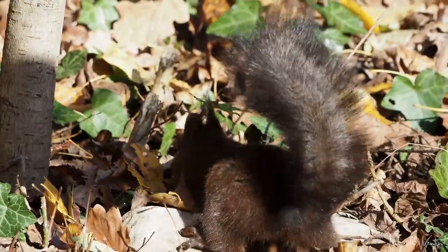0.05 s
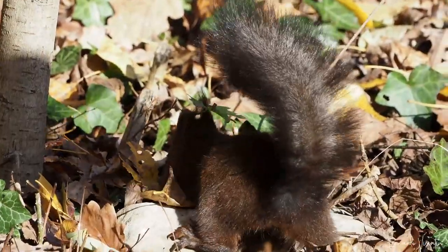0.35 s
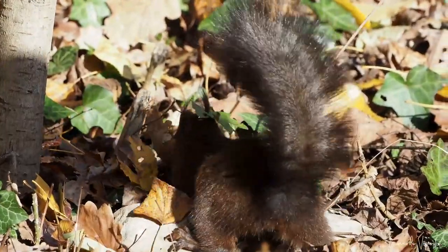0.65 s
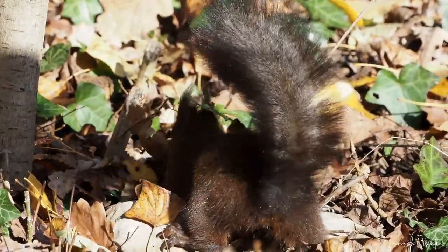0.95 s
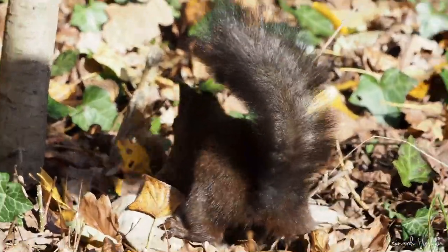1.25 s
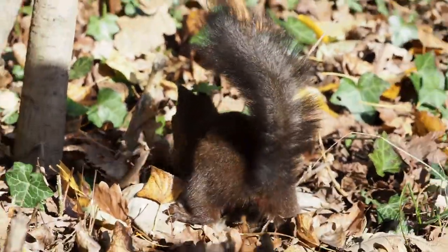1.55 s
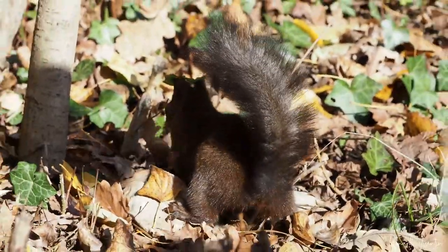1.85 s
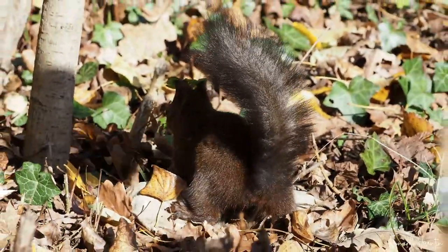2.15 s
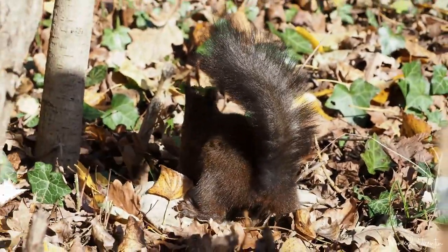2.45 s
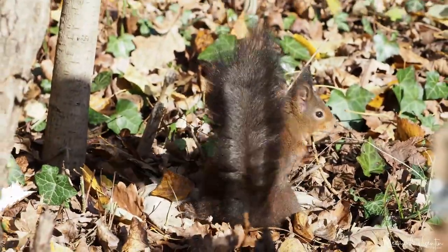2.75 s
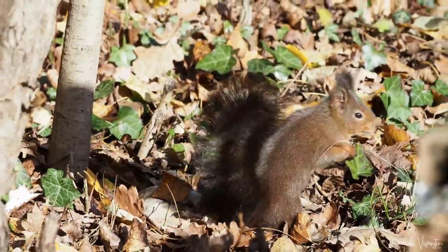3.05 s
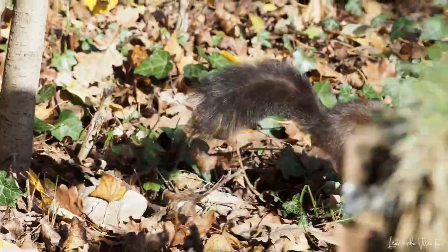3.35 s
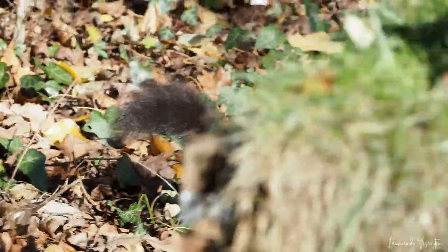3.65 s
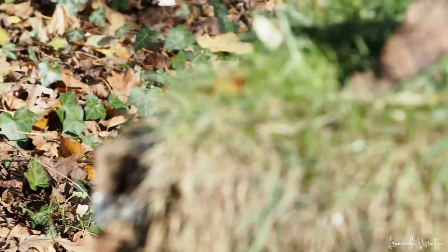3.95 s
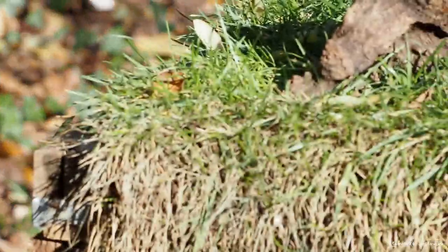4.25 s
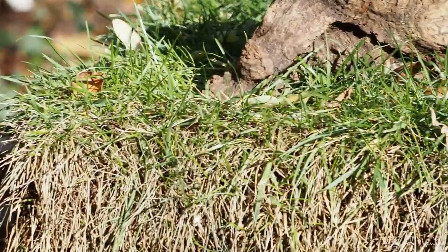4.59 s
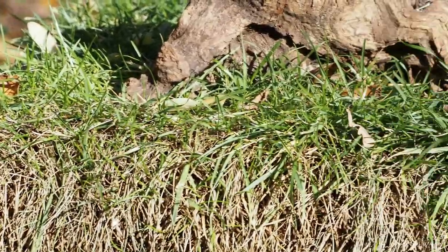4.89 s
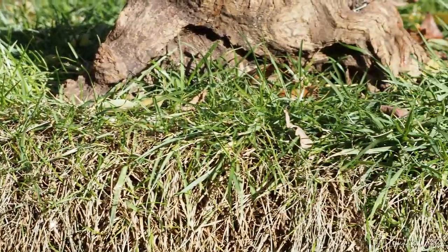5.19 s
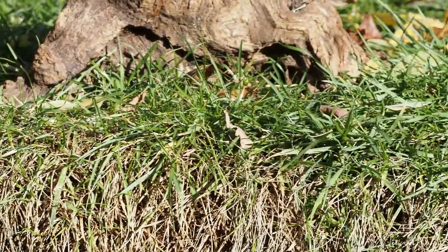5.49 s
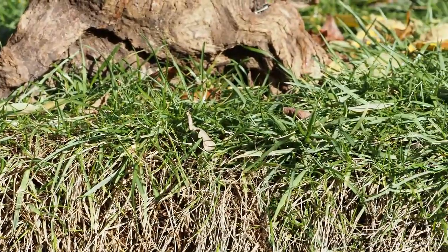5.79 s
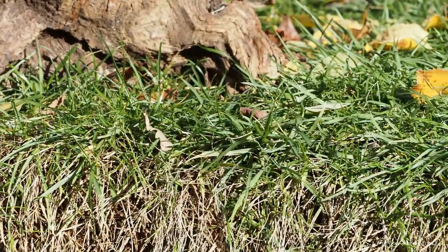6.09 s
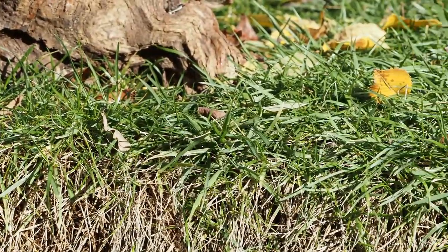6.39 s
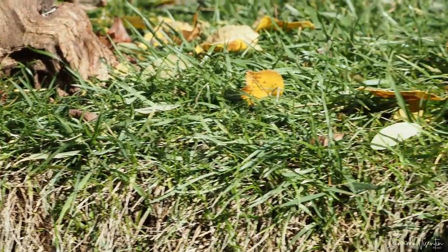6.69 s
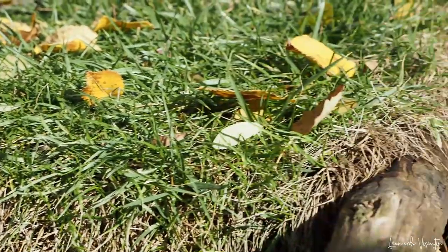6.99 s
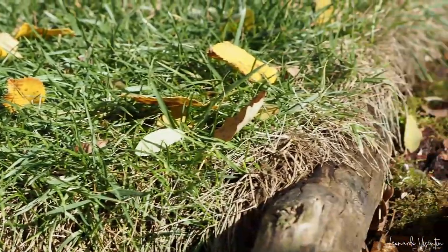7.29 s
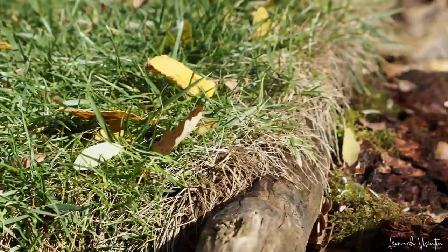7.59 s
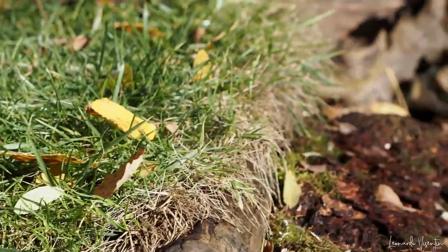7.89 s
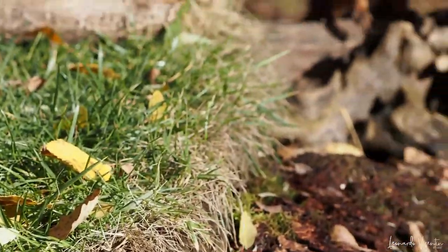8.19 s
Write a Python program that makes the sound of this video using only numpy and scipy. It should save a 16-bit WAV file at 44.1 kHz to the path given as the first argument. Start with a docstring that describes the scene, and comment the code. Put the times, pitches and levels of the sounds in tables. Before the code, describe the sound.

In quiet woodland, small paws scratch and patter through nearby leaf litter while twigs crack loudly and a hand briefly rubs the microphone. The squirrel moves off with a light crunch of leaves, leaving thin, echoing bird chirps, two faint crow caws and a livelier burst of twittering at the end, all over a distant rumble and soft hiss.

```python
"""A squirrel in dry leaves

A squirrel rummages and hops off, its paws making countless tiny breaks in the leaves. Close by,
twigs snap with a crack and a knock, a hand rubs on the camera, and later leaves crunch under a weight.
Small birds whistle and twitter and a far crow caws, all echoing between the trunks.
Under it lie faintly ticking leaves, a distant rumble with a low hum and the soft hiss of the wood."""
import sys
import numpy as np
from scipy import signal
from scipy.fft import rfft, irfft, next_fast_len
from scipy.io import wavfile
from scipy.ndimage import uniform_filter1d

SR = 44100
rng = np.random.default_rng(int(sys.argv[2]) if len(sys.argv) > 2 else 0)


def wav_out(sig):
    """Save sig, one row per channel (or a flat mono array), as 16-bit PCM at SR to the path in sys.argv[1]."""
    wavfile.write(sys.argv[1], SR, np.round(np.clip(np.atleast_2d(sig).T, -1, 1) * 32767).astype(np.int16))


N = 363384
TIME, FFT_SIZE = np.arange(N) / SR, next_fast_len(N, True)
FFT_HZ = np.fft.rfftfreq(FFT_SIZE, 1 / SR)

# leaves sliding: t/s at full strength, hold/s, scrape level/dB, hiss above the scrape/dB
SLIDES = [(0.0, 0.0065, -46.5, 5), (.09, 0.16, -56, 5), (0.394, 0.069, -60, 4), (0.938, 0.2, -54, 8.5),
          (1.254, 0.31, -51.5, 2), (1.683, 0.2, -59, 6), (2.95, 0.57, -59, 2), (4.26, .22, -59, 3.5),
          (4.361, .025, -51.5, 9)]
# paw strokes: t/s at the middle, length/s, level/dB
PAW_STROKES = [(0.758, 0.043, -54.5), (1.96, 0.039, -55), (2.043, 0.043, -52), (2.087, 0.055, -51),
               (2.347, 0.036, -54), (2.473, 0.051, -54.5), (2.608, 0.05, -53), (2.727, 0.068, -54),
               (2.852, 0.059, -53.5), (2.937, .06, -57), (3.057, .07, -56), (3.177, 0.077, -53),
               (3.265, .065, -53), (3.373, 0.05, -56), (3.455, 0.034, -60), (3.537, 0.038, -54.5),
               (3.673, 0.024, -57), (3.763, 0.14, -59.5), (3.845, 0.077, -54.5), (3.954, 0.051, -52.5),
               (4.07, 0.03, -53.5)]
# tone of the leaves' fine hiss and of their coarse scrape: f/Hz, level/dB
HISS_TONE = [(2000, -64), (4500, -10.5), (6500, -9), (8300, 1.5), (10200, -3.5), (12500, 1.5),
             (14500, -8.5), (16000, -30)]
SCRAPE_TONE = [(150, -2), (450, -5), (900, 0.5), (1400, -1.5), (2500, 2), (4800, -0.5), (6500, -11),
               (9000, -21), (16000, -16)]
# which side the leaves are heard on: f/Hz, left over right/dB
LEAF_PAN = [(200, 1), (700, -5.5), (2400, 2), (5000, -0.5), (8000, -0.5), (14000, -7.5)]


def squirrel(rise_s=0.051, fade_s=0.07, settle_s=0.13, hop_off_s=3.63, dulling_db_per_s=30):
    """Sliding leaves give a fine rustle, paw strokes a coarser crackle; both set off sharp ticks."""
    hiss, scrape, paw = np.zeros((3, N))  # loudness curves; hypot adds their power
    for s, hold_s, db, hiss_db in SLIDES:
        slide = amp(db) * swell(s, hold_s, rise_s, fade_s)
        scrape = np.hypot(scrape, slide)
        hiss = np.hypot(hiss, slide * amp(hiss_db))
    for s, length, db in PAW_STROKES:
        push = np.exp(-np.minimum((2 * (TIME - s) / length) ** 2, 20))
        settle = amp(-11.5) * swell(s, 0, length / 2, settle_s)  # the leaves sink back
        paw = np.hypot(paw, amp(db) * np.maximum(push, settle))
    stir = amp(-67) * swell(0, 4.55, rise_s, fade_s)  # a light rustle while the squirrel moves
    crisp = paw * amp(0.9 - dulling_db_per_s * np.maximum(TIME - hop_off_s, 0))  # dulls as it hops away
    crisp = np.hypot(crisp, amp(3) * stir)
    fine = crinkle(per_s=2800, spread_db=1.5, ring_s=0.0015)
    coarse = crinkle(per_s=1600, spread_db=1.5, ring_s=0.0017)
    sliding = hiss * colour(fine, HISS_TONE, LEAF_PAN)
    sliding += scrape * colour(fine[::-1], SCRAPE_TONE, LEAF_PAN)
    pawing = crisp * colour(coarse, HISS_TONE, LEAF_PAN)
    pawing += np.hypot(paw, stir) * colour(coarse[::-1], SCRAPE_TONE, LEAF_PAN)
    ticking = amp(-7) * (hiss / 2 + crisp) * leaf_ticks(per_s=130, spread_db=-0.5)
    return leaf_shimmer(sliding + pawing + ticking, depth_db=1.83)


def crinkle(per_s, spread_db, ring_s):
    """Tiny breaks of uneven size, each setting off a brief shiver of noise."""
    size = amp(spread_db * np.minimum(rng.exponential(1, N), 6))
    happens = rng.random(N) < per_s / SR
    power = signal.lfilter([1], [1, -np.exp(-1 / (ring_s * SR))], (size * happens) ** 2)
    return unit_rms(np.sqrt(power) * rng.standard_normal((2, N)))


def leaf_shimmer(x, depth_db):
    """Every leaf rings in its own range, so the tone changes from moment to moment."""
    bands = signal.stft(x, SR, nperseg=512)[2]
    patches = rng.standard_normal(bands.shape[1:])
    patches = uniform_filter1d(patches, size=18, axis=0)  # smooth over frequency
    patches = uniform_filter1d(patches, size=7, axis=1)  # smooth over time
    return signal.istft(bands * amp(depth_db * unit_rms(patches)), SR, nperseg=512)[1][:, :N]


# twigs breaking: t/s, crack level/dB, knock level/dB, crack brightness/dB per octave, left over right/dB
SNAPS = [(0.2068, -23, -55, 12, 2), (0.264, -27, -60, 11, 3), (0.6306, -9, -8.5, -2.5, 5.5),
         (.6453, -28.5, -52, -4, -13), (.6795, -30, -60, -2, 0), (2.42, -53, -33, -15, 0),
         (2.914, -29, -62, 9, -1), (3.3403, -20.5, -55, 7, -5), (3.39, 1.5, -28.5, -0.3, -0.5),
         (3.8113, -8, -21, 3, -2), (3.9999, -26.5, -28, -6, -1), (4.2784, -26, -42, 11, 8),
         (4.623, -36.5, -41, -9, 6), (4.661, -34, -29, -8, 3), (5.806, -45, -35, -5, 10),
         (6.1297, -35, -65, -2, -1), (7.0845, -27.5, -29.5, -2, 0)]
# tone of a brittle crack and of a woody knock: f/Hz, level/dB
CRACK_TONE = [(200, -38), (1500, -15.5), (2700, -8.5), (4000, -4.5), (5500, -4.5), (7000, -2), (8500, 0.5),
              (10300, -4.5), (12500, 2), (14000, -4), (16000, -12)]
KNOCK_TONE = [(60, 2.5), (120, 6.5), (210, -4), (400, 0.5), (600, -3.5), (850, 5.5), (1300, -2), (2200, 1),
              (3200, 1), (4700, -8), (16000, -49)]
# how long a twig rings: f/Hz, time to fade by 60 dB/s
KNOCK_FADE = [(150, 0.17), (800, 0.031), (3000, 0.023), (12000, 0.04)]
# which side the twigs are heard on: f/Hz, left over right/dB
SNAP_PAN = [(200, 3.5), (900, -9.5), (3000, -2), (5500, -5), (8000, -0.5), (12500, -3)]


def twig_snaps(crack_boost_db=2, knock_boost_db=4, splinters=0.96, splinter_s=0.0011, width=0.61):
    """A break is a sharp crack with a burst of splinters, and a short dull knock of the wood."""
    out, t = np.zeros((2, N)), np.arange(256) / SR
    for s, crack_db, knock_db, bright_db, pan_db in SNAPS:
        burst = rng.standard_normal((2, len(t))) * np.exp(-t / splinter_s)
        burst *= splinters / np.linalg.norm(burst, axis=1, keepdims=True)
        middle, side = echo_tail(KNOCK_FADE, size=4096)
        wood = np.array([middle + width * side, middle - width * side])
        burst[:, 0] = wood[:, 0] = 1  # the instant of the break
        crack = signal.fftconvolve(burst, click(CRACK_TONE, bright_db)[None])
        knock = signal.fftconvolve(wood, click(KNOCK_TONE, bright_db / 2)[None])
        add(out, s, amp(crack_db + crack_boost_db) * pan(pan_db) * crack)
        add(out, s, amp(knock_db + knock_boost_db) * pan(pan_db) * knock)
    return irfft(rfft(out, FFT_SIZE) * pan(look_up(SNAP_PAN, FFT_HZ)), FFT_SIZE)[:, :N]


def leaf_ticks(per_s, spread_db):
    """Brittle leaf edges give separate sharp ticks, scattered left and right."""
    size = amp(spread_db * np.minimum(rng.exponential(1, N), 3))
    happens = rng.random(N) < per_s / SR
    spikes = size * happens * rng.standard_normal((2, N))
    return unit_rms(signal.oaconvolve(spikes, click(CRACK_TONE)[None], axes=1)[:, :N])


# three hand rubs, then two rows of leaf crunch:
# t/s, rise/s, fade/s, rasp level/dB, rasp f/Hz, thud level/dB
RASPS = [(1.155, 0.024, 0.14, -47, 915, -31), (1.4, 0.016, 0.2, -51, 895, -38),
         (3.02, 0.0085, 0.084, -53, 900, -58), (4.29, 0.13, 0.17, -53.5, 456, -52),
         (4.37, 0.022, 0.065, -53, 1430, -60)]
# tone of the hollow rasp: multiple of its frequency, level/dB
RASP_TONE = [(.3, -17), (.7, -9), (1, 3.5), (1.5, -13.5), (2.2, -5.5), (3.1, -11), (5, -13.5), (12, -37)]
# tone of the low thud: f/Hz, level/dB
THUD_TONE = [(12, -2), (28, 9), (45, -15), (90, -26), (300, -35), (1000, -95)]


def rubs_and_crunch():
    """Rasps with a low thud: a hand rubs on the camera, then a weight presses leaves with a crunch."""
    out, t = np.zeros((2, N)), np.arange(SR) / SR
    grain = crinkle(per_s=570, spread_db=2.0, ring_s=0.0019)
    grain = grain + grain[::-1] / 2  # each side also hears the other
    thud = colour(rng.standard_normal((2, N)), THUD_TONE) * pan(4)
    for s, rise_s, fade_s, rasp_db, hz, thud_db in RASPS:
        span = slice(round(s * SR), round(s * SR) + SR)
        press = np.minimum(t / rise_s, 1) * np.exp(-np.maximum(t - rise_s, 0) / fade_s)
        ring = click([(hz * multiple, db) for multiple, db in RASP_TONE])
        rasp = unit_rms(signal.fftconvolve(grain[:, span], ring[None], axes=1)[:, :SR])
        add(out, s, press * (amp(rasp_db) * rasp + amp(thud_db) * thud[:, span]))
    return out


# thin whistles: t/s, length/s, first f/Hz, last f/Hz, level/dB, left over right/dB
WHISTLES = [(0.675, 0.15, 7870, 7430, -64, -5), (1.329, 0.1, 7330, 6750, -52, -1),
            (1.617, 0.14, 6640, 6430, -58, -3), (4.15, .1, 5600, 4930, -67, -8),
            (4.506, 0.093, 5950, 5830, -66, -5), (4.712, .13, 4354, 4290, -65, -1),
            (4.87, 0.34, 4280, 4200, -70, -1), (4.922, 0.048, 3450, 3050, -62, -2),
            (5.09, .06, 3160, 3040, -66, 0), (5.32, 0.056, 4160, 4190, -68.5, 0),
            (7.469, .085, 8140, 8130, -46, 4), (7.58, 0.069, 8350, 8150, -52.5, 3),
            (7.664, 0.088, 8090, 8120, -44, 5), (7.778, 0.082, 7950, 8600, -52.5, -2)]
# runs of quick chirps: t/s, number of notes, first f/Hz, last f/Hz, pitch step per note/%, level/dB
CHIRP_RUNS = [(1.294, 1, 6600, 8300, -6, -50), (1.755, 4, 6200, 7550, 3, -44.5),
              (5.496, 1, 5350, 4380, 0, -60.5), (5.548, 1, 3050, 3580, 0, -57),
              (5.635, 1, 3600, 3140, 0, -67), (5.805, 1, 4900, 3600, 0, -58.5),
              (5.849, 1, 3050, 3560, 0, -56), (7.072, 1, 2890, 3530, 3, -63),
              (7.136, 1, 3690, 4050, 0, -53.5), (7.152, 1, 4400, 5410, 0, -59),
              (7.308, 1, 3950, 5580, 2, -54), (7.335, 2, 6970, 8000, 6.5, -51),
              (7.565, 1, 8400, 7380, 3, -51), (7.75, 1, 8050, 7350, 0, -54),
              (7.965, 1, 6050, 5440, 0, -60.5), (7.985, 2, 5500, 3320, -8, -52),
              (8.0, 3, 3750, 2603, -9, -48), (8.11, 3, 3050, 2390, -0.5, -53.5)]


def songbirds(chirp_s=0.028, chirp_every_s=0.033, chirp_pan_db=1):
    """Small birds sing thin whistles and quick chirps, alone or in runs that step up or down."""
    out, notes = np.zeros((2, N)), list(WHISTLES)
    wobble, flutter = drift(350), amp(3.5 * drift(90))  # trembling of pitch and of loudness
    for s, count, first_hz, last_hz, step, db in CHIRP_RUNS:
        for k in range(round(count)):
            shift = (1 + step / 100) ** k
            notes.append((s + k * chirp_every_s, chirp_s, first_hz * shift, last_hz * shift,
                          db, chirp_pan_db))
    for s, length, first_hz, last_hz, db, pan_db in notes:
        start = round(s * SR)
        note = bird_note(length, first_hz, last_hz, np.roll(wobble, -start), np.roll(flutter, -start))
        add(out, s, amp(db) * pan(pan_db) * note)
    return out


def bird_note(length, first_hz, last_hz, wobble, flutter, waver=0.0049, buzz=0.17, ramp_s=0.0086):
    """One gliding note: nearly pure if its pitch holds, buzzy if it sweeps far."""
    progress = np.linspace(0, 1, round(length * SR))
    count = len(progress)
    glide = first_hz + (last_hz - first_hz) * (1 - (1 - progress) ** 1.184)  # eases onto the last pitch
    hz = glide + (waver * first_hz + buzz * abs(last_hz - first_hz)) * wobble[:count]
    fade = signal.windows.tukey(count, min(2 * ramp_s / length, 0.7))
    return unit_rms(fade * flutter[:count] * np.sin(2 * np.pi * np.cumsum(hz) / SR))


# caws: t/s, length/s, f/Hz, level/dB
CAWS = [(6.306, .07, 428.6, -57), (6.466, 0.086, 520.4, -52.5)]
# where the crow's throat rings: f/Hz, width/Hz, level/dB
THROAT = [(950, 190, 1), (1636, 170, 5.5), (2130, 350, -44)]


def crow(rough=0.73, jitter=0.05, arch=0.1):
    """Hoarse puffs of air, rising then falling in pitch, make the throat ring."""
    out = np.zeros((2, N))
    for s, length, pitch_hz, db in CAWS:
        count = round(length * SR)
        bend = np.sin(np.pi * np.linspace(0, 1, count)) - 1 / 2
        hz = pitch_hz * (1 + arch * bend + jitter * drift(180, count))
        puffs = np.exp(-5 * (np.cumsum(hz) / SR % 1))
        breath = unit_rms(puffs * rng.standard_normal(count))
        drive = (1 - rough) * unit_rms(puffs - puffs.mean()) + rough * breath
        voice = 0
        for centre_hz, width_hz, ring_db in THROAT:
            b, a = signal.iirpeak(centre_hz, centre_hz / width_hz / 2, SR)
            voice = voice + amp(ring_db) * signal.lfilter(b, a, signal.lfilter(b, a, drive))
        add(out, s, amp(db) * unit_rms(voice * signal.windows.tukey(count, 0.4)))
    return out


# how long the wood echoes: f/Hz, time to fade by 60 dB/s
TRUNK_FADE = [(500, 3), (1700, 1.9), (4000, 0.65), (8000, 0.55)]


def trunk_echo(call, direct_db, echo_db):
    """Trunks scatter a call into a long soft tail."""
    echo = signal.fftconvolve(call, echo_tail(TRUNK_FADE, size=65536), axes=1)[:, :N]
    return amp(direct_db) * call + amp(echo_db) * echo


def far_leaves():
    """Leaves farther off keep ticking faintly."""
    return amp(-71) * leaf_ticks(per_s=37, spread_db=5.0)


# loudness of the far rumble: t/s, level/dB
RUMBLE_LEVEL = [(0, -41), (2.7, -41), (3.5, -43), (8.2, -45)]
# tone of the rumble and of the open air: f/Hz, level/dB
RUMBLE_TONE = [(15, -2), (30, 2.5), (47, -6.5), (58, -3.5), (70, -0.5), (82, -16.5), (108, -13.5),
               (122, -12.5), (140, -24.5), (220, -27), (300, -40), (500, -100)]
AIR_TONE = [(94, -7.5), (160, -5.5), (296, -7.5), (353, -17.5), (462, -5.5), (560, -17), (679, -7.5),
            (942, -14), (1470, -15), (3770, -21), (5440, -18), (6590, -25.5), (8150, -19), (12900, -24.5),
            (16000, -29)]


def background(hum_hz=99.8, waver_hz=0.73, throb_db=2, hum_db=-52.5, air_db=-56):
    """Far rumble, a wavering hum and the even hiss of open air."""
    s, db = np.transpose(RUMBLE_LEVEL)
    rumble = amp(np.interp(TIME, s, db)) * colour(rng.standard_normal((2, N)), RUMBLE_TONE)
    hum = np.sin(2 * np.pi * np.cumsum(hum_hz + waver_hz * drift(5.6)) / SR)
    hum *= amp(throb_db * drift(16))
    air = amp(air_db) * colour(rng.standard_normal((2, N)), AIR_TONE)
    return (rumble + amp(hum_db) * unit_rms(hum)) * pan(0.9) + air


# how alike left and right are: f/Hz, likeness (1 = the same, 0 = unrelated)
LIKENESS = [(25, 1), (60, 0.95), (130, 0.71), (290, 0.28), (640, 0.56), (1410, 0.23), (3100, -0.14),
            (7000, -0.12)]


def colour(noise, tone, balance=((1, 0), (2, 0))):
    """Gives stereo noise a tone, centred by default; long waves reach both sides alike."""
    left, right = rfft(noise, FFT_SIZE)
    same = np.clip(look_up(LIKENESS, FFT_HZ), -1, 1)
    pair = np.array([left, same * left + np.sqrt(1 - same ** 2) * right])
    shaped = pair * amp(look_up(tone, FFT_HZ)) * pan(look_up(balance, FFT_HZ))
    return unit_rms(irfft(shaped, FFT_SIZE)[:, :N])


def click(tone, tilt_db=0, size=1024):
    """The sharpest click with a given tone, of energy 1; tilt_db brightens it per octave."""
    hz = abs(np.fft.fftfreq(size, 1 / SR))
    log_gain = np.log(amp(look_up(tone, hz) + tilt_db * np.log2(1 + hz / 1000)))
    wave = np.fft.ifft(np.exp(np.conj(signal.hilbert(log_gain)))).real  # packs the energy at the start
    return wave / np.linalg.norm(wave)


def echo_tail(fade_times, size):
    """Scattered echoes of energy 1 on each side, every band dying at its own speed."""
    hz, t, bands = signal.stft(rng.standard_normal((2, size)), SR, nperseg=128)
    fade = amp(-60 * t / look_up(fade_times, hz)[:, None])
    echoes = signal.istft(bands * fade, SR, nperseg=128)[1]
    return echoes / np.linalg.norm(echoes, axis=1, keepdims=True)


def swell(s, hold_s, rise_s, fade_s):
    """A loudness curve that grows until time s, holds, then dies away."""
    before = np.maximum(s - TIME, 0) / rise_s
    after = np.maximum(TIME - s - hold_s, 0) / fade_s
    return np.exp(-np.minimum(before + after, 30))


def drift(rate_hz, count=N):
    """A smooth random wander, with little motion faster than rate_hz."""
    smoothing = np.exp(-np.minimum(FFT_HZ / rate_hz, 20) ** 2)
    return unit_rms(irfft(rfft(rng.standard_normal(FFT_SIZE)) * smoothing, FFT_SIZE))[:count]


def amp(db):
    """Turns decibels into a gain."""
    return 10 ** (np.asarray(db) / 20)


def unit_rms(x):
    """Scales a signal to an average strength (rms) of 1."""
    return x / np.sqrt(np.mean(x ** 2) + 1e-20)


def look_up(table, hz):
    """Reads between a table's rows on a log-frequency axis."""
    f, value = np.transpose(table)
    return np.interp(np.log(hz + 1), np.log(f + 1), value)


def pan(db):
    """Left and right gains, with the left louder by db."""
    return amp(np.array([db, -db]).reshape(2, -1) / 2)


def add(mix, s, sound):
    """Mixes a sound in at s seconds."""
    part = mix[:, max(round(s * SR), 0):][:, :sound.shape[-1]]
    part += sound[..., :part.shape[1]]


def scene():
    """Near leaves and twigs have no echo; the birds are far among the trees."""
    birds = trunk_echo(songbirds(), direct_db=-4.5, echo_db=3)
    birds += trunk_echo(crow(), direct_db=-1.5, echo_db=-1.0)
    return squirrel() + far_leaves() + rubs_and_crunch() + twig_snaps() + birds + background()


def record(dry, ceiling=0.64, top_hz=16100):
    """Softly squashes the loudest crack, then cuts the very highest treble."""
    squashed = ceiling * np.tanh(dry / ceiling)
    lowpass = signal.firwin(255, top_hz, window=("kaiser", 9), fs=SR)
    return signal.oaconvolve(squashed, lowpass[None], "same")


dry = scene()
out = record(dry)
wav_out(out)
```